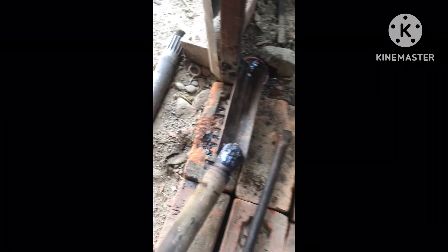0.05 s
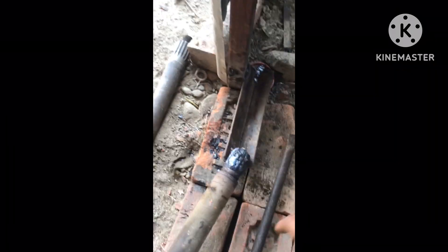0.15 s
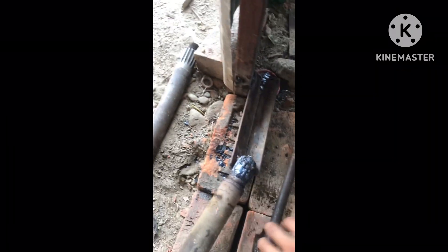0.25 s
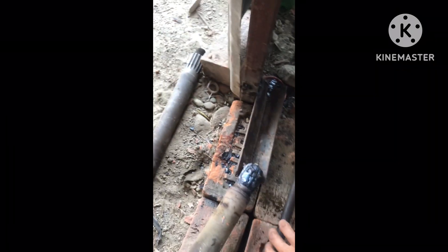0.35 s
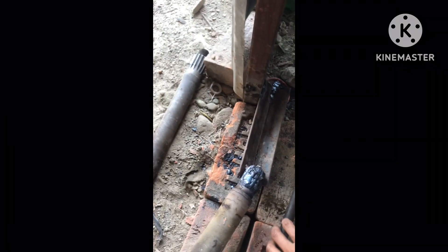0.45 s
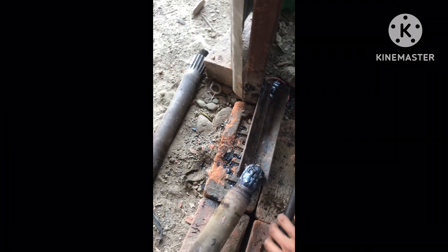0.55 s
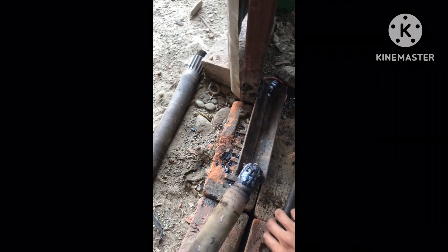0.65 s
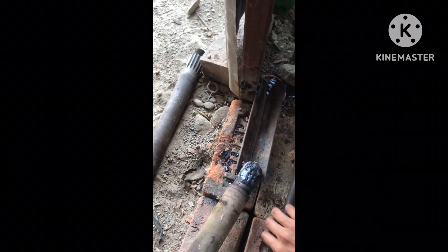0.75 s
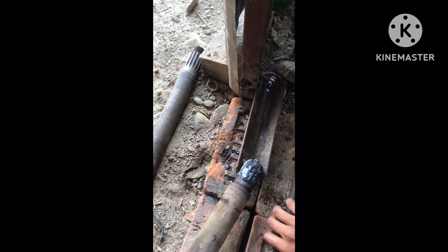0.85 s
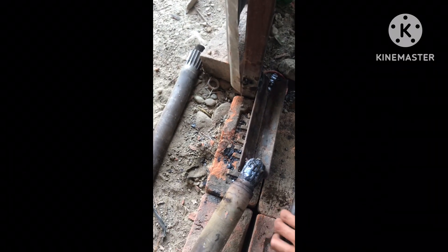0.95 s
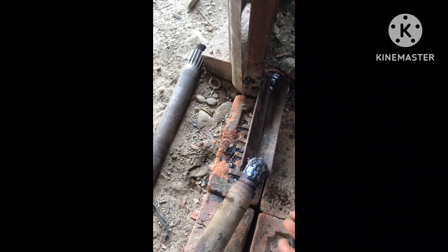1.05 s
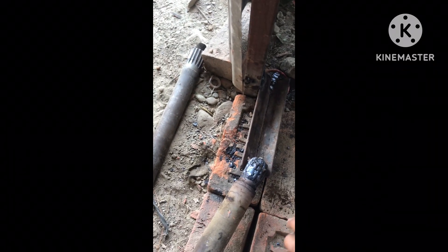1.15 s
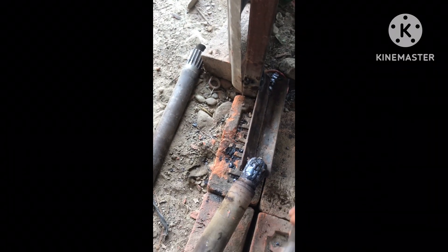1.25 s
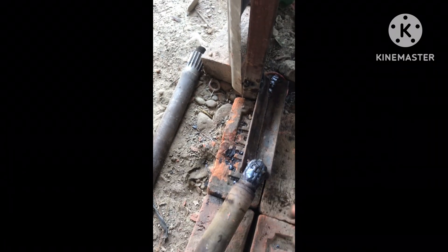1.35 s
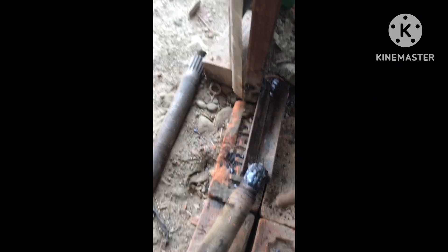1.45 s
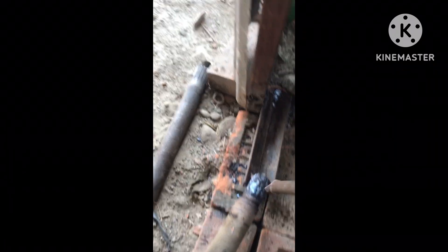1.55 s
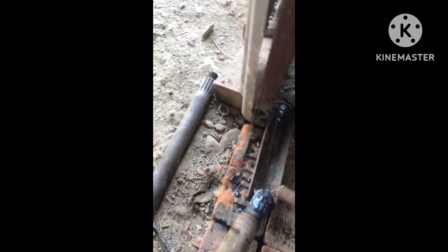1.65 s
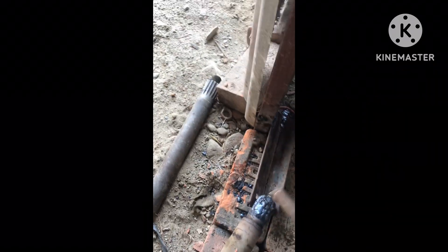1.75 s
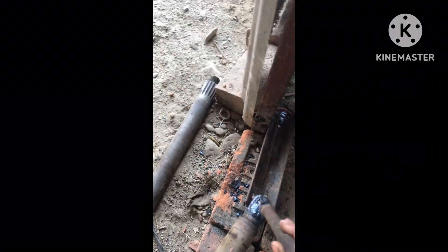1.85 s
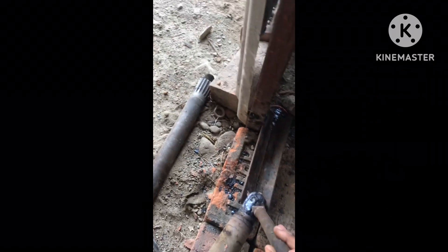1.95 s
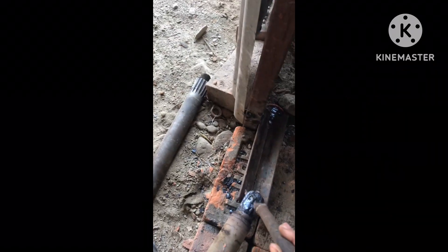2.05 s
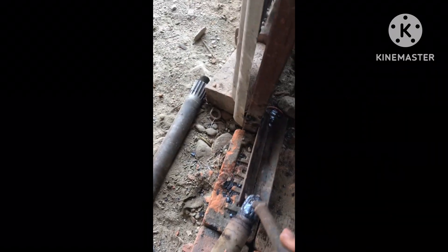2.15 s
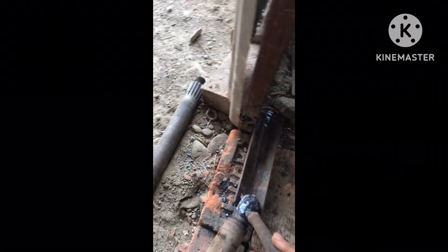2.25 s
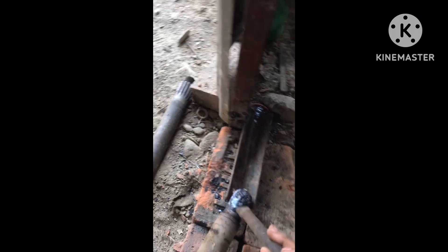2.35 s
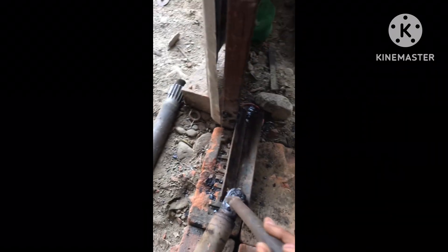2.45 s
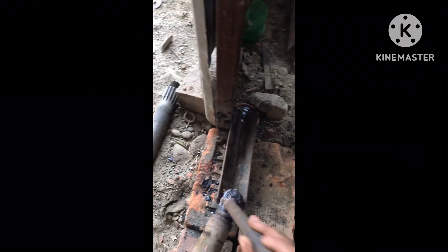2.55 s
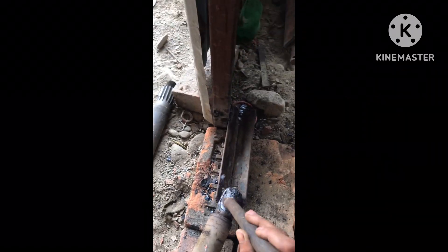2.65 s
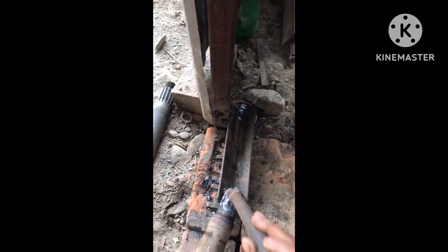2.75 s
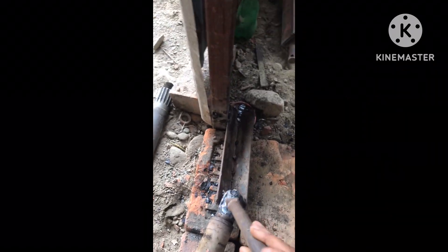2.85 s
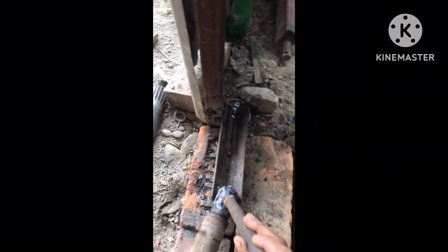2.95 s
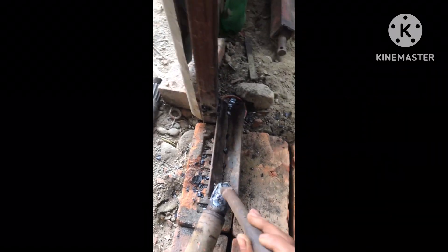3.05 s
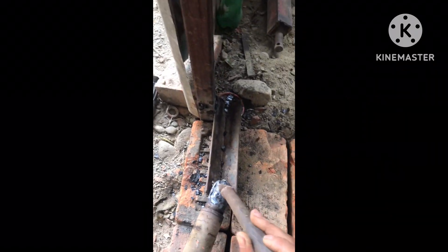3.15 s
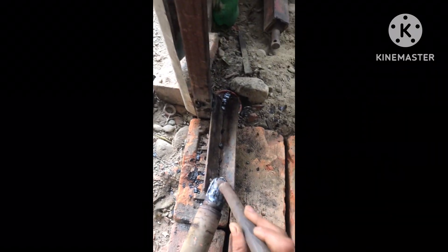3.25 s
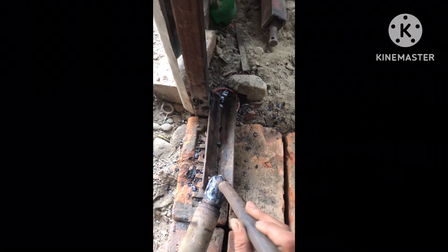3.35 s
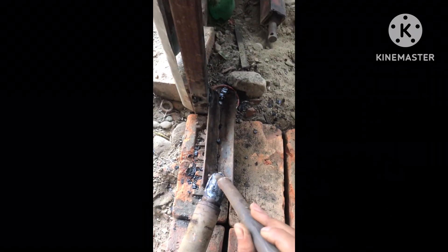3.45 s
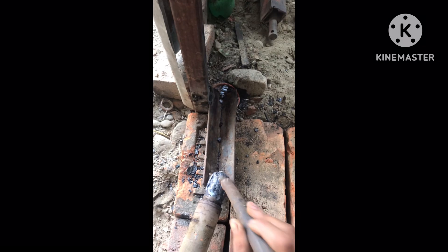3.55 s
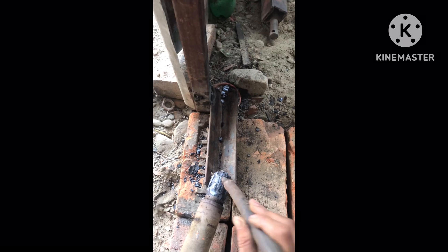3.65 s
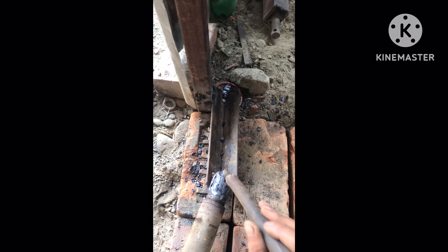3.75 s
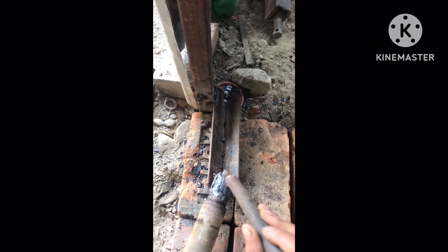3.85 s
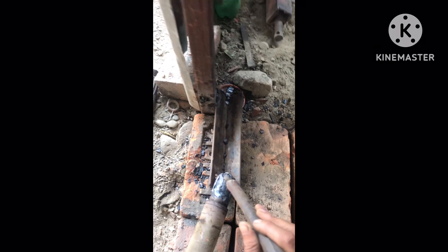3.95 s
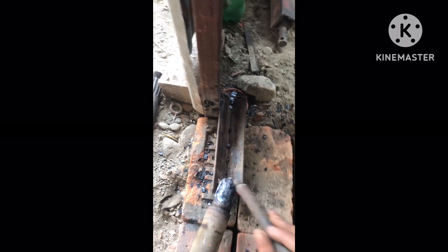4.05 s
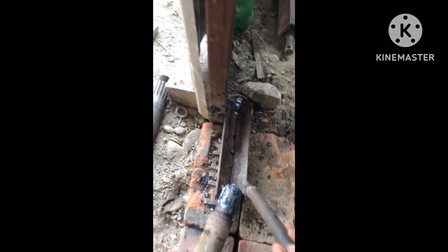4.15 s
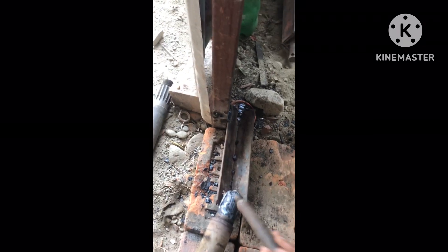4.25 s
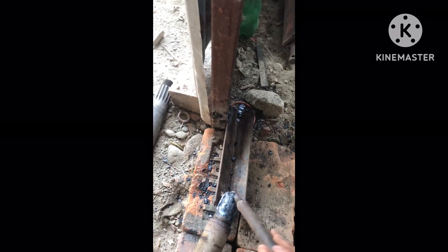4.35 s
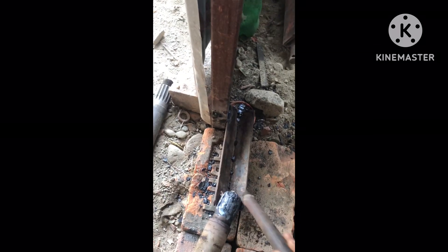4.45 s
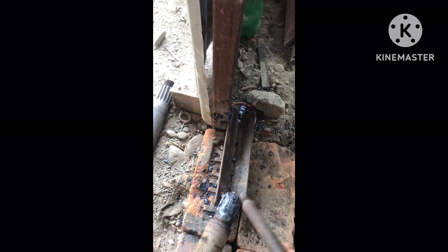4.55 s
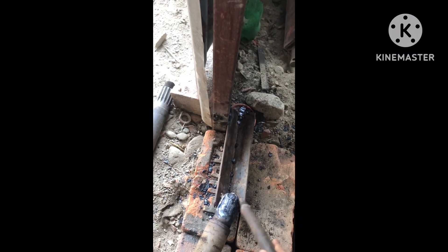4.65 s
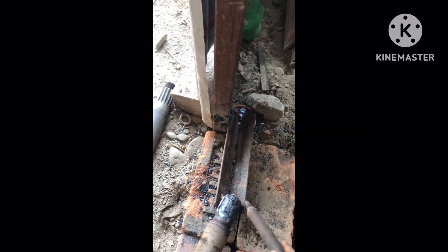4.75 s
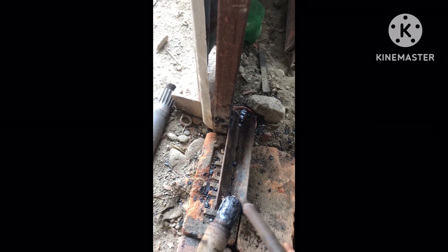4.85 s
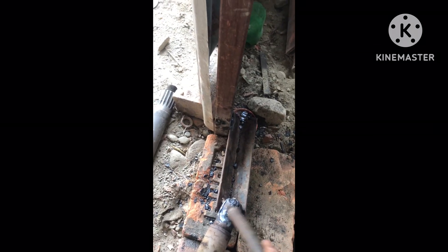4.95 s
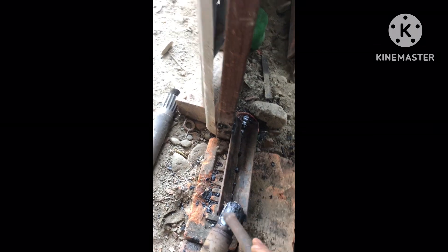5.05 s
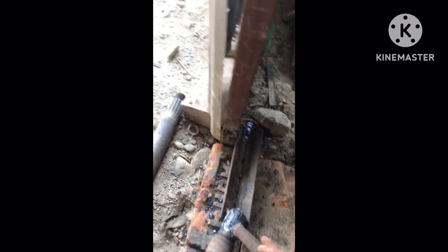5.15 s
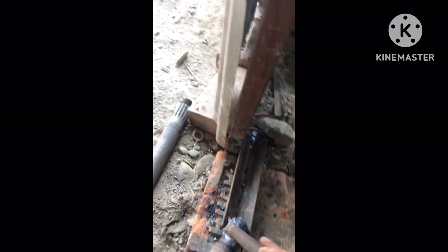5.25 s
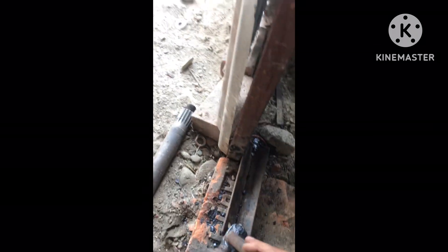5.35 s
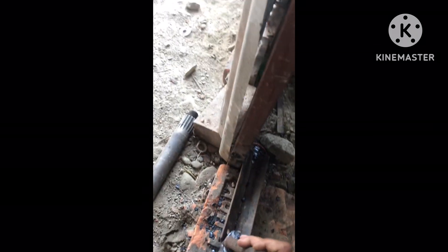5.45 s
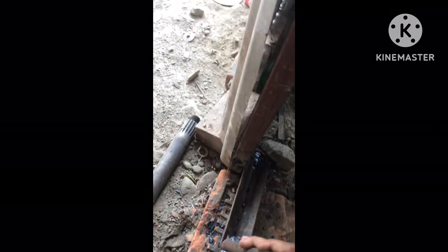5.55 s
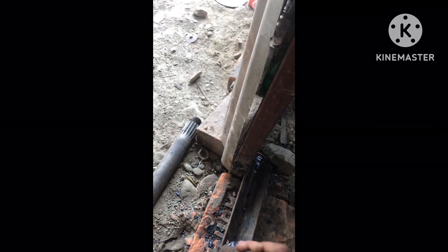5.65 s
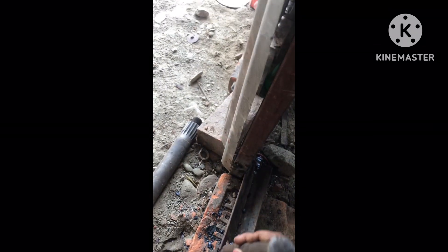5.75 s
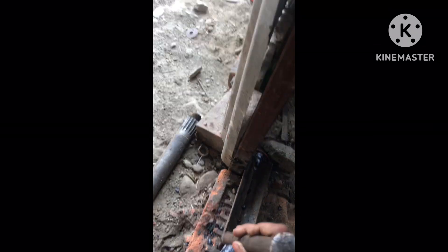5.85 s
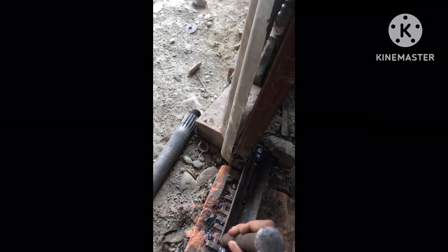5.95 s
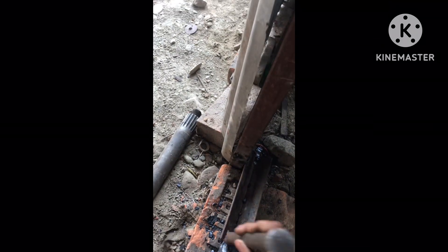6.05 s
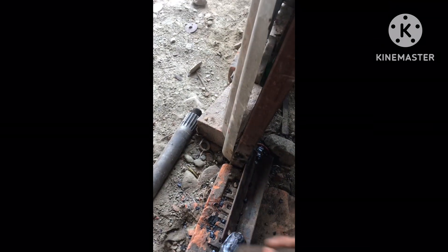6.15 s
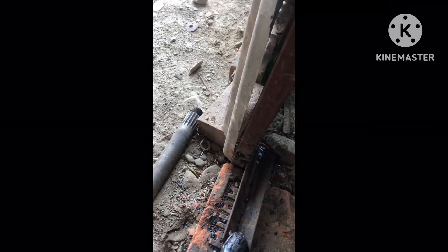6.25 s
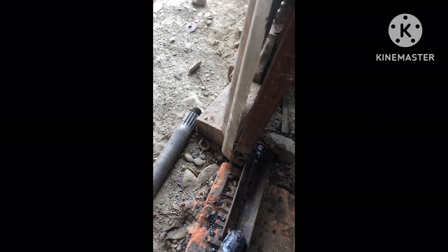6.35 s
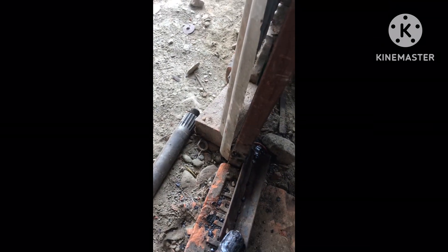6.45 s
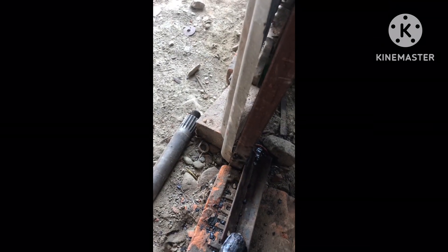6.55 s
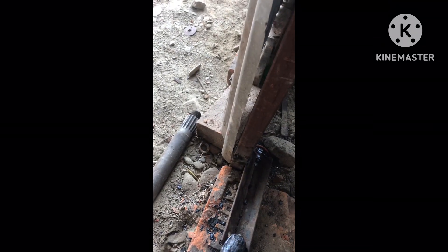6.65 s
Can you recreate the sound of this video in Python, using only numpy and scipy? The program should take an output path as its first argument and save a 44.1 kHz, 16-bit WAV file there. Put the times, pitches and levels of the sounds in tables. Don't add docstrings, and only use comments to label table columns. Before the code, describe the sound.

An open workshop is heard through a close microphone, with low distant traffic rumble, soft hiss and a wavering engine hum throughout. Tiny brittle ticks appear at 0.4-0.9 seconds. From about 0.95 to 1.2 a steel bar drags off gritty ground, with stony clicks and a thin metallic scrape, followed by a faint cloth brush near 1.6. At 1.9 the first blow lands on the welded pipe; twelve more follow about every third of a second until 6.0. Each is a hard, bright clank, often overloaded, with dense rattling ring and high singing bar tone, some with quick rebounds. Glassy slag chips and crumbs rain down mostly between 2.3 and 3.2, with a sharp chip at 3.6. The ringing fades while engines swell. At 6.58 the bar drops on bricks: dull thud, heavier landing at 6.62, light bounces and grit, until the end around 6.7.

```python
import sys
import numpy as np
from scipy import signal
from scipy.fft import rfft, irfft, next_fast_len
from scipy.io import wavfile

SR = 44100
rng = np.random.default_rng(int(sys.argv[2]) if len(sys.argv) > 2 else 0)


def master_out(mix):
    frames = np.transpose(np.atleast_2d(mix))
    ceiling = np.clip(frames, -1, 1)
    pcm = np.round(ceiling * 32767).astype(np.int16)
    wavfile.write(sys.argv[1], SR, pcm)


def field_ratio(decibels):
    return 10 ** (np.asarray(decibels, dtype=float) / 20)


N = 295911


def rms_one(x):
    return x / np.sqrt(np.mean(x ** 2) + 1e-20)


def in_time(rows, outside=None):
    s, *columns = np.transpose(rows)
    return [np.interp(np.arange(N) / SR, s, c, outside, outside) for c in columns]


def at_hz(points, hz):
    points = np.array(points)
    return np.interp(np.log(hz), np.log(points[:, 0]), points[:, 1])


def clicks(times, heights):
    out = np.zeros(N)
    out[np.round(np.asarray(times) * SR).astype(int)] = heights
    return out


def ring(x, hz, t60):
    r, w = field_ratio(-60 / (t60 * SR)), 2 * np.pi * hz / SR
    live = np.flatnonzero(np.abs(x) > 1e-5)
    span = slice(live[0], live[-1] + round(2 * t60 * SR))
    out = np.zeros(len(x))
    out[span] = signal.lfilter([0, np.sin(w)], [1, -2 * r * np.cos(w), r * r], x[span] + 1e-18)
    return out


def smear(x, tau_s, gain=1):
    return signal.lfilter([gain], [1, -np.exp(-1 / (tau_s * SR))], x)


def band(x, low_hz, high_hz):
    sos = signal.butter(2, [low_hz, min(high_hz, .45 * SR)], "band", fs=SR, output="sos")
    return signal.sosfilt(sos, x)


def add(out, s, piece):
    at = round(s * SR)
    out[at:at + len(piece)] += piece[:N - at]


def drift(rate_hz):
    r = np.exp(-80 * np.pi * rate_hz / SR)
    slow = signal.lfilter([1], [1, -2 * r, r * r], rng.standard_normal(N // 40 + 2002))[2000:]
    return np.interp(np.arange(N) / 40, np.arange(len(slow)), rms_one(slow))


def grit(per_s, spread_db):
    sizes = field_ratio(spread_db * np.minimum(rng.exponential(1, N), 4)) * rng.choice([-1, 1], N)
    return rms_one(sizes * (rng.random(N) < per_s / SR))


# [f/Hz, level/dB per Hz]
WORK_COLOUR = [(290, -57), (500, -30), (893, -18.5), (1110, -12.5), (1480, -15), (2030, -16.5),
               (2200, -6.5), (2680, -2.5), (2930, -18), (3300, -17.5), (3700, -9), (4300, -24.5),
               (4750, -14), (5650, -21), (14200, -25), (16000, -27)]
# [f/Hz, level/dB, t60/s]
WORK_CLEAR = [(1101, -26, 0.34), (1116, -19.5, 0.26), (1569, -23, 0.28), (2202, -32, 0.21),
              (2276, -30.5, 0.34), (2422, -33, 0.34), (1030, -31.5, 0.34), (2730, -28.5, 0.18),
              (3490, -29, 0.228), (3720, -34, .27), (3855, -32, 0.27), (4695, -40, 0.17),
              (5250, -29.5, 0.25), (4950, -27, 0.24), (2364, -35, 0.53)]
RIDGE_DB, RIDGE_HZ = 3.5, 28.2


def crowded_modes(starts):
    half_s = SR // 2
    bins = np.fft.rfftfreq(half_s, 1 / SR) + 1
    grid, lasting = np.linspace(0, SR / 2, 500), rng.standard_normal(500)
    gathered_db = sum(RIDGE_DB * np.exp(-.5 * ((bins - row[0]) / RIDGE_HZ) ** 2) for row in WORK_CLEAR)
    dense = np.zeros((2, N))
    for s in starts:
        ridges = np.interp(bins, grid, 0.14 * lasting + 0.4 * rng.standard_normal(500))
        colour_db = at_hz(WORK_COLOUR, bins) + 3.74 * ridges + gathered_db - 1.5
        piece = irfft(rfft(rng.standard_normal((2, half_s))) * field_ratio(colour_db), half_s)
        at = round(s * SR) - 100
        dense[:, at:at + half_s] = piece[:, :N - at]
    return dense


# [t/s, peak level/dB, low ring/dB, upper ring/dB, top ring/dB]
BLOWS = [(1.9309, -10, -10, -15, -3), (2.2585, -6.5, -5, -4, -5.5), (2.6213, -3.5, -11.5, -9, -11.5),
         (2.9334, -0.5, -13.5, -8.5, -6), (3.2625, -4, -11.5, -4, -12.5), (3.6231, 1, -13, -3.5, -9),
         (3.9563, 1.5, -19, -4, -8), (4.3082, 1, -16.5, -3.5, -5.5), (4.6533, 0, -16.5, -2, -4),
         (5.0289, 0.5, -17, -5.5, -7), (5.4035, -3.5, -11, -5, -15), (5.683, -3.5, -11.5, -3.5, -11.5),
         (5.986, -3.5, -9, -3, -5)]
# [t/s, peak level/dB, ring f/Hz, ring level/dB]
BOUNCES = [(1.9337, -4.5, 2826, -3), (1.956, -15, 987, -5), (2.634, -3.5, 2590, -7), (3.6383, 0, 2580, -11),
           (5.4167, -9, 2410, 1), (5.439, -2, 2590, -4.5), (5.7275, -9, 2340, -9), (5.728, -17, 1820, 3.5),
           (5.729, -18, 2940, 2), (5.707, -20, 1593, 3), (6.025, -4, 2260, -8)]
# [f/Hz, t60/s]
WORK_T60 = [(600, 0.39), (1100, 0.51), (2400, 0.22), (4000, 0.31), (7000, 0.26), (15000, 0.18)]
FULL_RING_DB, SHORTER_PER_DB, REBOUND_RING = -3, 0.06, 0.163
CUSHION_DB_PER_DB = 1.3
RATTLE_DB, RATTLE_HZ = 2.5, 32


def dense_ring():
    dense = crowded_modes([row[0] for row in BLOWS])
    rows = [row + (1 - SHORTER_PER_DB * max(FULL_RING_DB - row[1], 0),) for row in BLOWS]
    rows += [(row[0], row[1] - 4, -13, -15, -20, REBOUND_RING) for row in BOUNCES]
    t, out = np.arange(SR * 3 // 10) / SR, np.zeros(N)
    first = int(BLOWS[0][0] * SR) - 200
    edges = np.geomspace(500, 16000, 25)
    seating = rng.standard_normal((len(rows), len(edges)))
    rattle = [field_ratio(RATTLE_DB * drift(RATTLE_HZ))[first:] for count in range(3)]
    rise = 1 - np.exp(-t / 0.00046)
    early = 1.44 * np.exp(-t / 0.0074)
    for k, (low, high) in enumerate(zip(edges, edges[1:])):
        hz, fade = np.sqrt(low * high), np.zeros(N)
        for (s, db, low_db, upper_db, top_db, factor), chance in zip(rows, seating[:, k]):
            lightness_db = min(db - FULL_RING_DB, 0)
            colour_db = at_hz([(700, low_db + 8.5), (1050, low_db + 12.0), (1300, low_db + 12.0),
                               (2100, CUSHION_DB_PER_DB * lightness_db), (2900, 0),
                               (4000, upper_db + 3.5), (10000, top_db + 9.0)], hz)
            tail = np.exp(-np.log(1000) / (factor * at_hz(WORK_T60, hz)) * t)
            decay = field_ratio(lightness_db) * tail + early
            add(fade, s, field_ratio(db + colour_db + 2.16 * chance) * rise * decay)
        noise = band(dense[k % 2, first:], low, high)
        out[first:] += field_ratio(7.5) * fade[first:] * rattle[k // 8] * noise
    return out


# [lowest modes/dB, second/dB, middle cluster/dB, upper/dB, top/dB]
LYING = [(0, -7, -9, -1, -4), (-3, -7, -10, -8, -11), (0, -16, -9, -2, -4), (2, -4.5, -8, -13, 7),
         (-11, -14, -9, -3, -6), (-9, 4, 1.5, -4, 2), (-5.5, -0.5, 0.5, -5, 5), (-3.5, -3, 2, 1.5, -8),
         (-11, 8.5, -4.5, -2, 5), (-2, -7, 4, 1, -2.5), (8.5, 1, -4, -3, 8), (0, 6, 0, -3, 3),
         (10, -1, 9, -6, 4)]
SEATED_BY = [0, 0, 1, 2, 2, 2, 0, 3, 3, 3, 3, 4, 4, 4, 2]
SLOW_RISE_S = 0.011
LINGER_DB, LINGER_TIMES = -14, 2.24


def clear_ring():
    s, db = np.transpose(BLOWS)[:2]
    out = np.zeros(N)
    chatter = smear(clicks(s, field_ratio(db)), 0.01) * grit(1500, 4.3)
    under_blow = np.maximum(np.searchsorted(s, np.arange(N) / SR + .001) - 1, 0)
    for k, (hz, level_db, t60) in enumerate(WORK_CLEAR):
        lying = field_ratio(np.transpose(LYING)[SEATED_BY[k]][under_blow])
        chance_db = (k > 2) * rng.normal(0, 1.3, len(s))
        struck = lying * clicks(s, field_ratio(db + level_db + chance_db))
        out += ring(struck + lying * field_ratio(level_db - 28.0) * chatter, hz, t60)
        if hz < 1800:
            out -= ring(struck, hz, np.log(1000) * SLOW_RISE_S)
        if k < 6:
            out += ring(lying * field_ratio(level_db - 22.0 + LINGER_DB) * chatter, hz, LINGER_TIMES * t60)
    return out


# [level/dB, lower f/Hz, upper f/Hz, upper minus lower/dB]
CLANKS = [(-15.5, 1980, 2600, 7), (-16.5, 750, 2740, 14), (-14.5, 3500, 2400, 19), (-13, 3700, 3200, 7),
          (4, 2690, 3100, -14), (3, 2220, 920, -13), (4, 2200, 2200, -1), (-13.5, 3100, 2200, -2),
          (7.5, 2290, 2760, -7), (-22, 1600, 1700, -6), (-4, 1900, 2500, -6), (-9, 3200, 3900, 2),
          (3.5, 2280, 2546, -4.5)]
# [t/s, level/dB, f/Hz, t60/s]
LOOSE_PIECE = [(2.707, -28, 2832, .36), (2.706, -24, 4000, .05), (3.266, -29, 5050, .5),
               (2.708, -27, 14080, .12), (2.706, -31, 9600, .08)]
CLANK_T60_S, BOUNCE_T60_S = 0.069, 0.047
CRACK_DB, CRACK_S = -11, 0.0057


def clanks():
    t, blow_s = np.arange(SR * 3 // 10) / SR, [row[0] for row in BLOWS]
    crack = smear(clicks(blow_s, field_ratio(CRACK_DB)), CRACK_S) * rng.standard_normal(N)
    out = band(band(crack, 950, 8700), 950, 8700)
    rise = 1 - np.exp(-t / 0.00046)
    for s, (db, lower_hz, upper_hz, upper_db) in zip(blow_s, CLANKS):
        pair = np.sin(2 * np.pi * lower_hz * t) + field_ratio(upper_db) * np.sin(2 * np.pi * upper_hz * t)
        add(out, s, field_ratio(db - 7.0 - 60 * t / CLANK_T60_S) * rise * pair)
    for s, db, hz, t60 in LOOSE_PIECE:
        out += ring(clicks([s], field_ratio(db)), hz, t60)
    for s, db, hz, ring_db in BOUNCES:
        out += ring(clicks([s], field_ratio(db + ring_db)), hz, BOUNCE_T60_S)
    return out


def work():
    return dense_ring() + clear_ring() + clanks()


BAR_HZ = [2548, 2611, 4846, 4969, 5050, 7709, 10165, 11005, 11345, 14635, 15230, 8374]
# [held level/dB, held t60/s, free level/dB, free t60/s, column of BAR_BLOWS (integer part)]
BAR_MODES = [(-9, 0.28, 2.2, 0.93, 2.5), (-19, .1, -7, 0.31, -2), (-1, 0.23, 2, 0.44, 1.5),
             (-10.5, 0.1, -5, .2, 2.5), (-18, 0.23, -15, 0.33, 3), (-0.5, 0.2, -1, 0.16, 3),
             (-15, 0.038, -24, .05, 3.5), (-3, 0.19, -4, 0.14, 3.6), (-8, 0.18, -13, .2, 3.5),
             (-4, 0.091, -14, .15, 4), (-30, .07, -14, .1, 4), (-19, 0.77, -22, .9, -1)]
# [end-to-end/dB, 4846 Hz bend/dB, 2548 and 4969 Hz/dB, 2611 Hz and 5050-11345
# Hz/dB, 14635 and 15230 Hz and held end-to-end/dB]
BAR_BLOWS = [(-33.5, -27, -37, -24.5, -11.5), (-23, -29.5, -14, -23.5, -17), (-17, -20.5, -32, -15.5, -16),
             (-23.5, -14.5, -14, -18.5, -27), (-20, -15, -13.5, -24.5, -14.5), (-28, -17, -26, -37, -29),
             (-28, -17.5, -30, -25, -22), (-35, -13, -34, -21, -19), (-31.5, -19, -19, -42, -22),
             (-37, -21, -34, -25, -18), (-21, -14, -16, -22.5, -30), (-15.5, -9.5, -39, -21, -21),
             (-31, -9.5, -13, -19.5, -9.5)]
GRIP_T60_S = [0.62, 0.46, 0.44, 0.33, 0.81, 0.65, 0.42, 0.43, 0.66, 0.6, 0.27, 0.63, 0.6]
# [t after blow/s, extra loss/dB per s]
CHOKES = [(0.0079, 250), (0.04, 100), (0.027, 200), (0.013, 100), (0.23, 60), (.04, 150), (.04, 150),
          (0.016, 151), (0.037, 150), (.04, 150), (0.081, 150), (0.018, 500), (0.038, 365)]
# [t/s, level/dB, mode f/Hz]
NUDGES = [(3.265, -25, 5200), (3.266, -28, 14000), (3.29, -25, 12000), (3.267, -25, 6850),
          (5.437, -26, 10000), (5.472, -34, 14635), (5.708, -26, 14635), (5.758, -34, 14800),
          (1.082, -37, 15230), (1.082, -42, 9550), (1.152, -37, 13600), (1.175, -32, 11000),
          (5.406, -17, 7350), (5.76, -27, 11005), (2.295, -32, 14635)]
USUAL_GRIP_S = 0.63
END_RING_DB, NUDGE_T60_S = 1.5, 0.15


def struck_bar():
    out, t = np.zeros(N), np.arange(SR * 2 // 5) / SR
    blow_s = [row[0] for row in BLOWS]
    for hz, (held_db, held_t60, _, _, column) in zip(BAR_HZ, BAR_MODES):
        grip_tightens = 1 + 1.07 * np.exp(-t / 0.024)
        wave = np.sin(2 * np.pi * hz * t) * grip_tightens
        for s, blow, grip_s, (touch_s, loss) in zip(blow_s, BAR_BLOWS, GRIP_T60_S, CHOKES):
            decay_db = 60 * t / held_t60 * np.sqrt(USUAL_GRIP_S / grip_s)
            choke_db = np.clip(loss * (t - touch_s), 0, 22)
            add(out, s, field_ratio(blow[int(column)] + held_db - decay_db - choke_db) * wave)
    for s, blow, t60, end in zip(blow_s, BAR_BLOWS, GRIP_T60_S, blow_s[1:] + [N / SR]):
        t = np.arange(round(min(end - s, .6) * SR)) / SR
        fade = field_ratio(blow[0] + END_RING_DB - 60 * t / t60) * (1 + 1.4 * np.exp(-t / 0.062))
        add(out, s, fade * np.sin(2 * np.pi * BAR_HZ[-1] * t))
    for s, db, hz in NUDGES:
        out += ring(clicks([s], field_ratio(db)), hz, NUDGE_T60_S)
    return out


# [t/s, pressure level/dB, favoured bend f/Hz]
DRAG = [(.9, -86, 11000), (.95, -48, 11100), (1.02, -46, 5000), (1.1, -33, 7000), (1.135, -47, 4970),
        (1.17, -27, 3000), (1.21, -41, 2580), (1.27, -79, 2500)]
# [t/s, peak level/dB, favoured bend f/Hz]
DRAG_KNOCKS = [(0.946, -22, 13000), (0.9841, -32, 14600), (1.006, -34, 4900), (1.03, -33, 14000),
               (1.0415, -28, 14000), (1.048, -28, 11000), (1.08, -22, 13000), (1.093, -32, 7700),
               (1.108, -23, 8000), (1.161, -34, 4000), (1.151, -24, 11000), (1.1714, -20, 8050)]
DRAG_BENDS_DB = [8.5, -7, -2, -8, 3, -2.5, -8, 1.5, -4, 3, 0, 2]
DRAG_DB_PER_OCTAVE, KNOCK_DB_PER_OCTAVE = 6.5, 13
KNOCK_BODY_DB, SAND_DB, SAND_FOLLOWS = -10.5, -49, 0.7
LIFT_S, LIFT_DB_PER_S = 1.195, 500


def dragged_bar():
    out, dragged = np.zeros(N), slice(0, 2 * SR)
    pressure_db = in_time(DRAG, -120)[0]
    favoured_hz = in_time(DRAG)[1][dragged]
    knock_s, knock_db, knock_hz = np.transpose(DRAG_KNOCKS)
    knocks = clicks(knock_s, field_ratio(knock_db))
    sand = [grit(2450, 4.2), grit(1400, 3.7)]
    since_lift_s = np.clip(np.arange(N)[dragged] / SR - LIFT_S, 0, .2)
    for k, (hz, (held_db, held_t60, *_)) in enumerate(zip(BAR_HZ, BAR_MODES)):
        lifted = field_ratio(-LIFT_DB_PER_S * (hz / 8000) ** 2 * since_lift_s)
        rub_db = pressure_db[dragged] - 0.5 - DRAG_DB_PER_OCTAVE * np.abs(np.log2(hz / favoured_hz))
        hit_db = knock_db + 14.0 - KNOCK_DB_PER_OCTAVE * np.abs(np.log2(hz / knock_hz))
        rubbed = field_ratio(rub_db + held_db) * sand[k % 2][dragged]
        struck = field_ratio(held_db) * clicks(knock_s, field_ratio(hit_db))[dragged]
        t60 = min(held_t60, 0.11 + 0.16 * (k == 0))
        out[dragged] += 0.081 * lifted * field_ratio(DRAG_BENDS_DB[k]) * ring(rubbed + struck, hz, t60)
    rattle = smear(knocks, 0.0035) * rng.standard_normal(N)
    hiss = field_ratio(SAND_DB + SAND_FOLLOWS * (pressure_db + 39)) * (pressure_db > -100) * grit(900, 3.7)
    out += band(hiss, 10400, 17000) + band(2.5 * knocks + 0.59 * rattle, 11000, 18000)
    return out + field_ratio(KNOCK_BODY_DB) * band(knocks + rattle, 2500, 8700)


# [t/s, thud/dB, bar ring/dB, grit/dB, hardness/dB per octave]
DROP = [
    (6.584, -8.5, -30.5, -20, -4),
    (6.618, 4.5, -18.5, -15, -0.5),
    (6.643, -24, -22.5, -40, 2),
    (6.675, -18, -31, -23, -9),
]
FREE_RISE_S = 0.011
SETTLE_S, SETTLE_DB = 6.682, -4.5


def free_bar():
    out, rows = np.zeros(N), np.array(DROP)
    resting = field_ratio(SETTLE_DB * np.clip((np.arange(N) / SR - SETTLE_S) / 0.0073, 0, 1))
    for hz, (_, _, free_db, free_t60, _) in zip(BAR_HZ, BAR_MODES):
        landing = clicks(rows[:, 0], field_ratio(rows[:, 2] + free_db + rng.normal(0, 5.0, len(rows))))
        out += resting * (ring(landing, hz, free_t60) - ring(landing, hz, np.log(1000) * FREE_RISE_S))
    return out


def bar():
    return struck_bar() + dragged_bar() + free_bar()


# [t/s, peak level/dB, ring f/Hz]
CHIPS = [(0.406, -27, 14000), (0.5535, -31, 14350), (0.8624, -41, 13500), (0.9203, -36, 14300),
         (2.3274, -26, 14400), (2.373, -33, 13800), (2.379, -30, 13500), (2.386, -36, 14000),
         (2.394, -37, 13500), (2.4654, -40, 14400), (2.5063, -38, 14000), (2.72, -22, 15200),
         (2.8366, -30, 14100), (2.4149, -25, 16000), (2.4289, -24, 15200), (2.521, -25, 10400),
         (2.5364, -37.5, 11700), (2.5621, -37, 14200), (2.6955, -18, 13500), (2.745, -19, 14100),
         (2.7706, -25.5, 11700), (2.79, -21, 14400), (2.8185, -31, 10500), (2.8689, -22, 14000),
         (2.8794, -27, 13500), (3.0483, -28, 14100), (3.0949, -26, 13900), (3.1888, -19.5, 16400),
         (3.201, -28, 14400), (3.636, -6.5, 14600), (3.7994, -47, 14300), (5.87, -19, 14200)]
# [t/s, extra level/dB]
CHUNKY = [(2.4149, 7), (2.521, 9), (2.6955, 4), (2.745, 6), (3.636, 17), (5.87, 9)]
# [t/s, level/dB]
FLAKE_HITS = [(2.3274, -40), (2.6955, -28), (2.7706, -40), (2.7896, -41), (2.8794, -42), (2.936, -22),
              (3.0483, -36), (3.636, -20)]
# [f/Hz, level/dB, t60/s]
FLAKES = [(9600, -3, 0.049), (11700, -3, 0.035), (12100, -11, .04), (13500, -9, .03), (14080, -5, 0.066),
          (15000, -2, .02)]
# [t/s, level/dB, decay/s]
PUFFS = [(3.601, -25.5, 0.013), (3.935, -22.5, 0.01), (4.287, -28.5, 0.023), (4.634, -32, .015),
         (5.007, -32, .012), (6.55, -48, .03)]
CHIP_T60_S, CHIP_RING_DB, CHIP_BODY_DB = .022, -11, -10.5
FLAKE_SPREAD_DB = 0.5


def chips():
    out, t = np.zeros(N), np.arange(SR // 10) / SR
    for s, db, hz in CHIPS:
        snap = rng.standard_normal(len(t)) * np.exp(-t / 0.0022)
        partials = [(0.88, 0.78), (1.0, 0.51), (0.12, 0.29)]
        rings = sum(g * np.sin(2 * np.pi * hz * k * t) for k, g in partials)
        body_db = CHIP_BODY_DB + sum(extra for at, extra in CHUNKY if abs(at - s) < .005)
        chip = field_ratio(CHIP_RING_DB - 60 * t / CHIP_T60_S) * rings
        chip += 0.49 * band(snap, 8500, 17700) + field_ratio(body_db) * band(snap, 4300, 10800)
        add(out, s, field_ratio(db) * chip)
    s, db = np.transpose(FLAKE_HITS)
    chance = rng.standard_normal((len(s), len(FLAKES)))
    for k, (hz, flake_db, t60) in enumerate(FLAKES):
        out += ring(clicks(s, field_ratio(db + flake_db + FLAKE_SPREAD_DB * chance[:, k])), hz, 1.7 * t60)
    for s, db, decay_s in PUFFS:
        add(out, s, field_ratio(db) * band(rng.standard_normal(len(t)), 1200, 4400) * np.exp(-t / decay_s))
    crumbs = np.zeros(N)
    for s, db, _, _, top_db in BLOWS:
        add(crumbs, s, field_ratio(db + top_db - 21.0) * np.exp(-np.arange(SR // 3) / SR / 0.04))
    return out + band(crumbs * grit(700, 3.7), 6000, 15500)


# [t/s, level/dB]
SHOWER = [
    [(2.31, -60), (2.456, -62), (2.6, -58)],
    [(2.68, -38), (2.806, -43), (2.854, -51), (2.92, -49)],
    [(3.0, -57), (3.22, -60)],
]


def shower():
    fall = sum(field_ratio(in_time(rows, -120)[0]) for rows in SHOWER) * grit(1200, 3.5)
    dealt = rng.integers(0, len(FLAKES), N)
    rings = sum(field_ratio(db) * ring(fall * (dealt == k), hz, t60) for k, (hz, db, t60) in enumerate(FLAKES))
    return 0.12 * rings + 1.8 * band(fall, 5400, 15600)


# [f/Hz, level/dB, t60/s]
BRICK = [(383, -6, 0.046), (470, 0, 0.025), (820, 12, 0.0062), (1220, 6, 0.008), (1520, 6.5, 0.007),
         (3000, 1, 0.016), (3400, -9, 0.034)]
# [t/s, f/Hz, level/dB, t60/s]
IRON = [(6.585, 2170, -21.5, 0.23), (6.588, 968, -24, 0.16), (6.619, 974, -13.5, 0.077),
        (6.62, 1627, -3.5, 0.066), (6.62, 2010, -7, 0.1), (6.645, 960, -18, 0.044),
        (6.677, 1710, -14, 0.054), (6.676, 1100, -19, 0.026), (6.619, 4480, -30, 0.37),
        (6.677, 3430, -27, .05), (6.62, 11000, -31, 0.16)]


def drop():
    s, thud_db, _, grit_db, hard_db = np.transpose(DROP)
    thuds = np.zeros(N)
    for k, (hz, db, t60) in enumerate(BRICK):
        hit_db = thud_db + db - 8.0 + hard_db * np.log2(hz / 800) + rng.normal(0, 3.9, len(s))
        thuds += (-1) ** k * ring(clicks(s, field_ratio(hit_db)), hz, t60)
    landings = clicks(s, field_ratio(grit_db))
    puff = smear(landings, 0.0045, 0.46) + smear(landings, 0.022, 0.22)
    iron = sum(ring(clicks([at], field_ratio(db)), hz, t60) for at, hz, db, t60 in IRON)
    return iron + band(thuds, 230, 3000) + puff * band(rng.standard_normal(N), 500, 15500)


# [t/s, level/dB]
THUMPS = [(1.949, -29), (2.271, -28), (2.64, -26.5), (3.273, -29.5), (3.641, -30), (5.7, -23.5),
          (5.999, -29.5)]
THUMP_HZ, THUMP_T60_S, THUMP_RISE_S = 201.2, 0.4, 0.0038


def thumps():
    t, out = np.arange(SR // 3) / SR, np.zeros(N)
    wave = (1 - np.exp(-t / THUMP_RISE_S)) * np.sin(2 * np.pi * THUMP_HZ * t)
    for s, db in THUMPS:
        add(out, s, field_ratio(db - 60 * t / THUMP_T60_S) * wave)
    return out


# [t/s, level/dB]
RUSTLE = [(1.47, -69), (1.586, -46), (1.62, -72), (1.66, -56)]


def rustle():
    cloth = band(rng.standard_normal(N) + .5 * grit(2930, 4), 9800, 16600)
    return field_ratio(in_time(RUSTLE, -120)[0]) * rms_one(cloth)


def walls(x):
    echoes = clicks(rng.uniform(.006, .07, 14), rng.choice([-1, 1], 14) * 0.08)[:SR // 10]
    echoes *= np.exp(-np.arange(len(echoes)) / SR / 0.052)
    return band(signal.fftconvolve(x, echoes)[:N], 310, 19000)


# [t/s, level/dB]
YARD_LEVEL = [(0, 4), (.2, -1), (1.3, 0.5), (1.9, 2.5), (2.8, 1), (3.4, -0.5), (3.86, 1), (4.07, -3.5),
              (4.6, -3), (4.95, -0.5), (5.6, 3), (6.0, 6), (6.4, 4), (6.71, 8)]
# [f/Hz, level/dB per Hz]
YARD_COLOUR = [(15, -65), (25, -42), (43, -3), (59, -3), (80, 0.5), (200, -12), (277, -13), (309, -16),
               (354, -15.5), (516, -22.5), (659, -23), (1130, -22), (4870, -39.5), (14400, -54.5),
               (16000, -51.5)]
RUMBLE_FOLLOWS, DRONE_FOLLOWS, HISS_FOLLOWS, RUMBLE_GUST_DB = 0.51, 0.82, 1, 2


def yard():
    yard_db, = in_time(YARD_LEVEL)
    rumble_db = RUMBLE_FOLLOWS * yard_db + RUMBLE_GUST_DB * drift(5.7)
    out, edges = np.zeros(N), 22 * 2 ** np.arange(0, 9.7, 1 / 3)
    white = rng.standard_normal((2, N))
    for k, (low, high) in enumerate(zip(edges, edges[1:])):
        hz = np.sqrt(low * high)
        drone = at_hz([(120, 0), (400, 1), (1500, 1), (6000, 0)], hz)
        hiss = at_hz([(1500, 0), (6000, 1)], hz)
        swell_db = (1 - drone - hiss) * rumble_db
        swell_db = swell_db + (drone * DRONE_FOLLOWS + hiss * HISS_FOLLOWS) * yard_db
        level_db = at_hz(YARD_COLOUR, hz) + swell_db + 1.0 * drift(8.7)
        out += field_ratio(level_db) * band(white[k % 2], low, high)
    return field_ratio(-29.5) * rms_one(out)


# [f/Hz, width/Hz]
HUM_LINES = [(76, 4.7), (134, 6.1), (280, 11.8)]
# [t/s, level/dB]
FIRST_ENGINE = [(0, -32), (2.3, -30), (2.9, -36.5), (3.9, -36), (4.9, -48.5), (5.9, -41), (6.22, -30),
                (6.71, -57)]
# [t/s, level/dB]
SECOND_ENGINE = [(0, -40), (1.3, -64), (2.0, -34.5), (3.0, -40), (3.94, -36), (4.8, -43), (4.97, -26),
                 (5.17, -34), (5.48, -29), (5.9, -31.5), (6.22, -26), (6.71, -28)]
IDLE_STEADY, IDLE_WANDER_HZ = 0.81, 1


def engines():
    first_db, = in_time(FIRST_ENGINE)
    second_db, = in_time(SECOND_ENGINE)
    out = np.zeros(N)
    for (hz, width_hz), db in zip(HUM_LINES, [first_db, second_db, second_db - 6.5]):
        wavering = rms_one(ring(rng.standard_normal(N), hz, 1.76 / width_hz))
        out += field_ratio(db - 2.0) * (1 - IDLE_STEADY * (hz < 100)) * wavering
    turns = np.cumsum(HUM_LINES[0][0] + IDLE_WANDER_HZ * drift(1.0)) / SR
    return out + field_ratio(first_db + 4.5) * IDLE_STEADY * np.sin(2 * np.pi * turns)


def scene():
    near = work() + bar() + chips() + shower() + drop() + thumps()
    return (near + walls(near) + rustle() + yard() + engines())[None]


# [f/Hz, width/Hz, level/dB]
MIC = [(6030, 1800, -2.5), (10500, 160, -8), (13000, 460, 0.5), (14200, 410, 4.5)]
# [t/s, share 0-1]
THINNED = [(3.3, 0), (3.35, .85), (3.41, .99), (3.47, .99), (3.55, .9), (3.57, 0), (5.76, 0), (5.8, .95),
           (5.858, .95), (5.865, 0)]
# [f/Hz, share 0-1]
THINNED_HZ = [(6800, 0), (7300, .8), (7600, .8), (7710, .2), (7820, 1), (8050, 1), (8250, 0), (8500, 0),
              (8700, 1), (11000, 1), (11600, 0)]
# [f/Hz, share 0-1]
THINNED_LAST_HZ = [(11000, 0), (11600, 1), (12600, 1), (13400, 0)]


def shape_top(dry):
    size = next_fast_len(N)
    bins = np.fft.rfftfreq(size, 1 / SR)
    port_db = sum(db * np.exp(-.5 * ((bins - hz) / width_hz) ** 2) for hz, width_hz, db in MIC)
    heard = rfft(dry, size) * field_ratio(port_db)
    around = irfft(heard * np.interp(bins, *np.transpose(THINNED_HZ)), size)[:, :N]
    above = irfft(heard * np.interp(bins, *np.transpose(THINNED_LAST_HZ)), size)[:, :N]
    share = in_time(THINNED, 0)[0]
    return irfft(heard, size)[:, :N] - share * around - share ** 10 * above


def top_cut(x):
    return signal.sosfilt(signal.butter(12, 16460, fs=SR, output="sos"), x)


def record(dry):
    x = shape_top(dry)
    x = signal.sosfilt(signal.butter(2, 38, "high", fs=SR, output="sos"), x)
    x = signal.sosfilt(signal.cheby1(8, 1, 15250, fs=SR, output="sos"), x)
    knee = 5.0
    x = x / (1 + np.abs(x) ** knee) ** (1 / knee)
    x = signal.sosfilt(signal.butter(6, 16600, fs=SR, output="sos"), x)
    return top_cut(np.clip(1.091 * x, -1, 1))


dry = scene()
out = record(dry)
master_out(out)
```